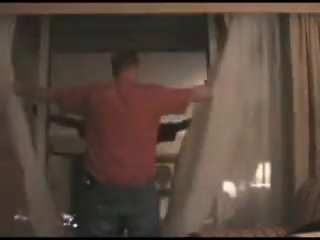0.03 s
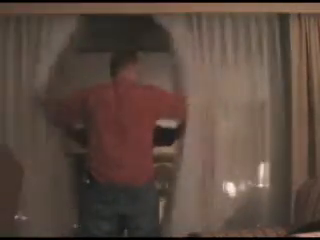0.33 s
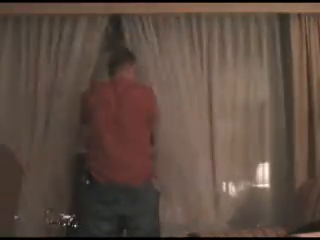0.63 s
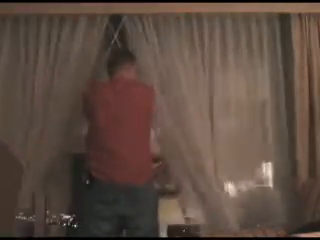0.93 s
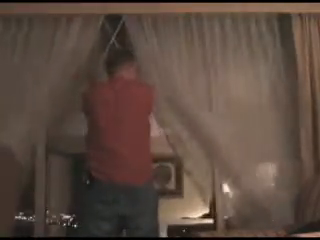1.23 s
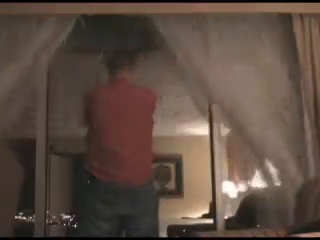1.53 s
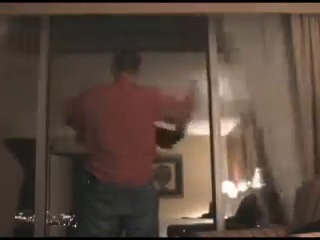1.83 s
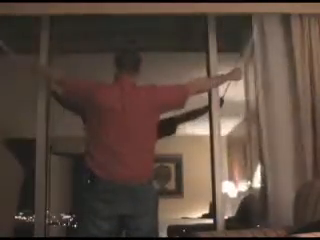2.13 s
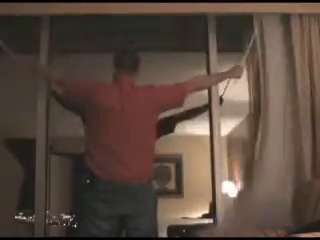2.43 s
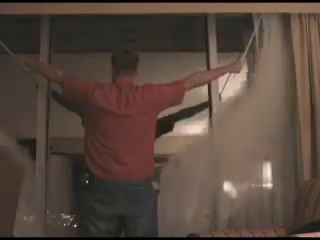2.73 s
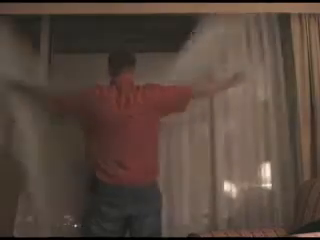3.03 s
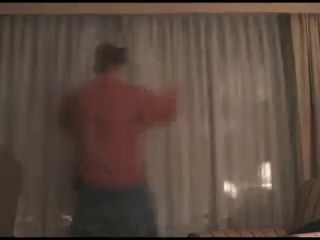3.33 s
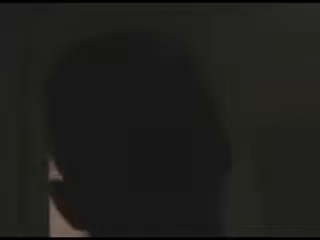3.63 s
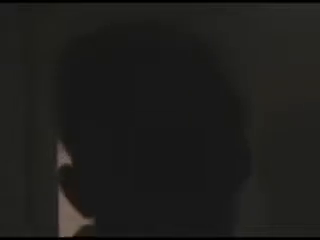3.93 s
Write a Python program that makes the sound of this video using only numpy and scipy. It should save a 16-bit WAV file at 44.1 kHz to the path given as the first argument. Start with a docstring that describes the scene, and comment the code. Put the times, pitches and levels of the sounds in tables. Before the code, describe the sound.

In a furnished room, curtains are tugged back and forth five times without a pause, their gliders swishing and clicking along a ringing rail. The sliding cuts off and a quiet room hum with a thin whine remains.

```python
"""Curtains on a ceiling track.

Five pulls, shut and open, in a furnished room. Plastic gliders chatter in the rail and make it ring,
then clack together as they bunch up; the track jolts with dull thuds.
At the end the sliding breaks off and a low room hum with a thin whine remains."""
import sys
import numpy as np
from scipy import signal
from scipy.fft import rfft, irfft, next_fast_len
from scipy.io import wavfile
from scipy.ndimage import map_coordinates

SR = 44100
rng = np.random.default_rng(int(sys.argv[2]) if len(sys.argv) > 2 else 0)


def file_out(sig):
    """Save sig as 16-bit WAV at sys.argv[1]."""
    # one column per channel
    cols = np.atleast_2d(sig).T
    # limit, then scale
    lim = np.clip(cols, -1, 1)
    pcm = np.round(lim * 32767).astype(np.int16)
    wavfile.write(sys.argv[1], SR, pcm)


N = 176400
IMPACT_ATTACK_S, IMPACT_T60_S = 0.0014, 0.14

# track body spectrum (frequency [Hz], density [dB])
BODY_SPECTRUM = [(90, -36), (170, -9.5), (290, -8.5), (460, -10.5), (540, -2), (720, -2.5), (900, -5),
                 (1250, 0), (1600, 0), (2000, -4), (3500, -48)]
# glider fizz spectrum (frequency [Hz], density [dB])
FIZZ_SPECTRUM = [(2500, -26), (4500, -1), (5500, -2.5), (6600, 0.5), (8500, -2.5), (10300, -3), (11500, -7),
                 (12600, -17), (13500, -36)]


def sliding():
    """Gliders drag along the rail: faster is louder, and the rail's resonances swell and fade."""
    # per pull: envelope points (time [s], level [dB])
    pulls = [
        [(0.0, -40.5), (0.06, -28), (0.17, -18), (0.378, -18), (0.39, -22), (0.5, -19.5), (.6, -29),
         (0.7, -34.5), (0.76, -50)],
        [(0.76, -49), (0.796, -24), (0.942, -18.5), (1.342, -17), (1.364, -19.5), (1.416, -19), (1.444, -23),
         (1.58, -31.5)],
        [(1.58, -32.5), (1.674, -22.5), (1.81, -18.5), (1.952, -18), (2.138, -24.5), (2.184, -28), (2.196, -25),
         (2.3, -41.5)],
        [(2.3, -37), (2.316, -39.5), (2.36, -28), (2.6, -19.5), (2.786, -15.5), (2.912, -19), (3.106, -34.5),
         (3.14, -45)],
        [(3.14, -40.5), (3.25, -23.5), (3.366, -17), (3.556, -16.5), (3.58, -19.5), (3.6, -15), (3.684, -26.5),
         (3.69, -34)],
    ]
    # per pull: (body [dB], fizz [dB], rail pitch [Hz], rail width [Hz], scrape pitch [ratio], body rise [s])
    colours = [(-7.5, -8.5, 3380, 980, 1, .02), (-6.5, -7.5, 3255, 170, 0.99, 0.088),
               (-7, -9.5, 3220, 380, 1.03, .01), (-6, -8.5, 3275, 140, 1.005, 0.017),
               (-5.5, -9, 3410, 230, 0.99, 0.016)]
    # per pull: rail resonance swell (peak time [s], spread [s], gain [dB])
    rail_swells = [(.32, 0.41, -1), (.98, 0.091, 0.5), (1.85, 0.14, -3), (2.51, 0.083, 1),
                   (3.53, 0.032, -1)]
    # per pull: swell of the rail's hollow (peak time [s], spread [s], gain [dB])
    hollow_swells = [(.22, 0.097, -6), (.9, 0.41, -10.5), (1.7, 0.13, -7.5), (2.5, 0.25, -11),
                     (3.28, 0.051, -8.5)]
    # scrape spectrum (frequency [Hz], density [dB])
    scrape_spectrum = [(700, -40.5), (1500, -18), (1850, -12.5), (2200, -5.5), (2900, -1.5), (3500, -2.5),
                       (4000, -7), (4600, -11.5), (5500, -18.5), (9000, -64)]
    # narrow track modes (frequency [Hz], width [Hz], gain [dB])
    track_modes = [(558, 50, -3.5), (692, 73, -2.5), (2164, 32, 7.5), (5060, 32, -16)]
    hollow_hz, hollow_width_hz = 1126, 156
    taps_db, tinkle_db, modes_db = -18.5, -15, -14
    body_db_per_db, fizz_db_per_db = 1.12, 1.03
    body_db_per_s = -10  # as the gliders gather
    modes = lambda hz: sum(amp(db) * resonance(centre, width)(hz) for centre, width, db in track_modes)
    jerks_db = 0.52 * wobble(45)
    out = np.zeros((2, N))
    for pull, colour, rail_swell, hollow_swell in zip(pulls, colours, rail_swells, hollow_swells):
        body_db, fizz_db, rail_hz, rail_width_hz, pitch_ratio, rise_s = colour
        times_s, levels_db = np.transpose(pull)
        span = slice(int(times_s[0] * SR), int(times_s[-1] * SR))
        t = clock()[span]
        speed_db = np.interp(t, times_s, levels_db) - levels_db.max() + jerks_db[span]
        trend_db = body_db_per_s * (t - t.mean())
        taps = glider_taps(len(t)) * amp(speed_db + taps_db)
        scrape = friction(lambda hz: shape(scrape_spectrum)(hz / pitch_ratio), speed_db)
        tinkles = tinkle(len(t)) * amp(speed_db + tinkle_db)
        body = friction(shape(BODY_SPECTRUM), body_db_per_db * speed_db + body_db + trend_db)
        body *= np.clip((t - times_s[0]) / rise_s, 0, 1) ** 2
        fizz = friction(shape(FIZZ_SPECTRUM), fizz_db_per_db * speed_db + fizz_db)
        rail = friction(resonance(rail_hz, rail_width_hz, order=2), speed_db + swell_db(t, *rail_swell))
        hollow = friction(resonance(hollow_hz, hollow_width_hz, order=2),
                          speed_db + swell_db(t, *hollow_swell))
        track = friction(modes, speed_db + modes_db)
        layers = taps + scrape + tinkles + body + fizz + rail + hollow + track
        out[:, span] += amp(levels_db.max()) * layers
    return out


def friction(response, level_db):
    """Dense slips and rubbing, filtered by a response, following a level curve."""
    size = len(level_db)
    slips = chatter(next_fast_len(size), rate_per_s=2600, spread_db=5, life_s=0.00027, smooth=1)
    return stereo(slips, response)[:, :size] * amp(level_db)


def chatter(size, rate_per_s, spread_db, life_s, smooth):
    """Tiny slips of random size, each a short burst, over a share of smooth rubbing."""
    onsets = rng.random(size) < rate_per_s / SR
    energy = onsets * amp(spread_db * np.clip(rng.standard_normal(size), -2, 2)) ** 2
    power = signal.lfilter([1], [1, -np.exp(-1 / (life_s * SR))], energy)
    return rng.standard_normal((2, size)) * np.sqrt(power / (power.mean() + 1e-12) + smooth)


def glider_taps(size):
    """Single gliders tick along the way."""
    taps = chatter(next_fast_len(size), rate_per_s=48, spread_db=0.5, life_s=0.0075, smooth=0)
    return stereo(taps, shape(FIZZ_SPECTRUM))[:, :size]


def tinkle(size, rate_per_s=40, low_hz=4300, high_hz=10500, attack_s=0.0004, t60_s=0.07):
    """Loose gliders tap one another; each tap rings at three pitches of its own."""
    t = np.arange(SR // 10) / SR
    envelope = (1 - np.exp(-t / attack_s)) * amp(-60 * t / t60_s)
    out = np.zeros((2, size + len(t)))
    for place, *pitches in rng.random((int(rate_per_s * size / SR), 4)):
        hz = low_hz * (high_hz / low_hz) ** np.array(pitches)
        phase_rad = rng.normal(0, 0.83, (2, len(hz), 1))
        ring = np.sin(2 * np.pi * hz[:, None] * t + phase_rad).sum(axis=1)
        out[:, int(place * size):][:, :len(t)] += ring * envelope
    return unit(out[:, :size])


def clacks(crack_db=-3.5, crack_t60_s=0.043):
    """A glider runs into its neighbours: a crack, then a dying rattle of bright ticks and rail knocks."""
    # collisions (time [s], level [dB], knock gain [dB])
    collisions = [(.423, -24, 2), (.462, -21.5, 5.5), (0.494, -23.5, -2), (.571, -33, 11), (0.618, -33, 4),
                  (.788, -49, -8), (1.032, -23.5, 4), (1.11, -25, 11), (1.322, -19.5, 1), (1.375, -20, -4),
                  (1.405, -21.5, 4), (1.811, -17.5, 0.5), (1.924, -20.5, 1.5), (1.971, -16, -13),
                  (2.014, -19, -0.5), (2.067, -22, 2), (2.19, -23.5, 2), (2.814, -21.5, 0),
                  (2.876, -17.5, 0), (2.901, -20, -7), (3.483, -17, -2), (3.55, -17, -16),
                  (3.594, -22.5, -2)]
    # rail knock spectrum (frequency [Hz], density [dB])
    knock_spectrum = [(200, -27), (550, -17), (1200, -5.5), (1800, -4), (2800, 7.5), (3500, 3.5),
                      (5000, -12.5), (9000, -33)]
    t = np.arange(SR // 5) / SR
    decay = amp(-60 * t / IMPACT_T60_S) + amp(crack_db - 60 * t / crack_t60_s)
    envelope = (1 - np.exp(-t / IMPACT_ATTACK_S)) * decay
    out = np.zeros((2, N + SR))
    for start_s, db, knock_db in collisions:
        ticks = chatter(len(t), rate_per_s=3000, spread_db=2, life_s=0.0005, smooth=0.5)
        bright = stereo(ticks, shape(FIZZ_SPECTRUM))
        knocks = amp(knock_db) * stereo(ticks, shape(knock_spectrum))
        out[:, round(start_s * SR):][:, :len(t)] += amp(db) * envelope * (bright + knocks)
    return out[:, :N]


def thuds():
    """The whole track jolts, dull and short."""
    # jolts (time [s], level [dB])
    jolts = [(0.465, -22.5), (.573, -36), (1.323, -32), (2.07, -20.5), (3.596, -20)]
    t = clock()
    envelope = sum((t > s) * amp(db - 60 * abs(t - s) / IMPACT_T60_S) for s, db in jolts)
    return stereo(rng.standard_normal((2, N)), shape(BODY_SPECTRUM)) * envelope


def pings():
    """The rail rings briefly as the second pull jerks the curtains from rest."""
    # rail rings (time [s], frequency [Hz], level [dB], T60 [s])
    rings = [(.787, 1149, -30, .2), (.787, 2520, -19.5, .17), (.836, 2690, -15.5, 0.16)]
    out = np.zeros(N)
    for start_s, hz, db, t60_s in rings:
        age_s = np.maximum(clock() - start_s, 0)
        envelope = (1 - np.exp(-age_s / IMPACT_ATTACK_S)) * amp(db - 60 * age_s / t60_s)
        out += envelope * np.sin(2 * np.pi * hz * age_s + 0.5 * wobble(220))
    return out


def room(x, t60_s=0.2, wet_db=-10.5, gap_s=0.004):
    """Adds the short, soft reverberation of a furnished room."""
    t = np.arange(SR // 2) / SR
    tail = stereo(rng.standard_normal((2, len(t))), np.ones_like) * amp(-60 * t / t60_s) * (t > gap_s)
    return x + amp(wet_db) * signal.fftconvolve(x, tail / np.linalg.norm(tail[0]), axes=1)[:, :N]


def room_tone(air_db=-40):
    """Air and low tones while the curtains move."""
    # air spectrum (frequency [Hz], density [dB])
    air_spectrum = [(25, -32), (50, -2.5), (85, -4.5), (165, -3), (220, -7), (500, -12), (2000, -20.5),
                    (10000, -32.5), (15000, -48)]
    # low tones (frequency [Hz], level [dB])
    lines = [(84, -56.5), (122, -55.5), (166, -50)]
    return amp(air_db) * air(air_spectrum) + tones(lines)


def hum(air_db=-37, rustle_s=3.96, rustle_width_s=0.019, rustle_db=-47.5):
    """Low tones and a thin whine over still air, with one faint rustle."""
    # still air spectrum (frequency [Hz], density [dB])
    air_spectrum = [(25, -43), (49, -17), (75, -7), (95, -24), (167, -3.5), (237, -21.5), (286, -19.5),
                    (373, -25.5), (3730, -44.5), (5010, -36), (5420, -43.5), (15000, -52.5)]
    # hum and whine (frequency [Hz], level [dB])
    lines = [(64.6, -51), (143, -60), (162, -42), (186, -56), (4953, -60), (8188, -68), (11600, -69)]
    envelope = np.exp(-0.5 * ((clock() - rustle_s) / rustle_width_s) ** 2)
    rustle = amp(rustle_db) * envelope * air(FIZZ_SPECTRUM)
    return tones(lines) + amp(air_db) * air(air_spectrum) + rustle


def tones(lines):
    """Slightly wavering steady tones."""
    return sum(amp(db) * np.sqrt(2) * np.sin(2 * np.pi * hz * clock() + 0.5 * wobble(12))
               for hz, db in lines)


def air(spectrum):
    """Steady diffuse noise, rms 1."""
    # stereo image of the air (frequency [Hz], left-right correlation [-1..1])
    correlation = [(60, -0.72), (100, -0.55), (150, 0.27), (1400, 0.58), (3100, 0.73), (7000, 0.5)]
    return stereo(rng.standard_normal((2, N)), shape(spectrum), correlation)


def stereo(pair, response, correlation=None):
    """Two independent drives filtered and mixed as mid and side, rms 1."""
    # stereo image of the curtains (frequency [Hz], left-right correlation [-1..1])
    curtain_correlation = [(60, -0.21), (150, 0.52), (350, 0.86), (1400, 1), (2800, 0.95), (5500, 0.78),
                           (9000, 0.85), (13000, 0.0039)]
    hz = np.fft.rfftfreq(pair.shape[1], 1 / SR)
    angle = np.arccos(log_interp(correlation or curtain_correlation, hz)) / 2
    mid, side = irfft(rfft(pair) * response(hz) * [np.cos(angle), np.sin(angle)], pair.shape[1])
    return unit(np.array([mid + side, mid - side]))


def resonance(centre_hz, width_hz, order=1):
    """Response of a damped mode, cascaded order times."""
    return lambda hz: (1j * hz * width_hz / (centre_hz ** 2 - hz ** 2 + 1j * hz * width_hz)) ** order


def swell_db(t, peak_s, spread_s, peak_db):
    """One peak with gentle flanks."""
    return peak_db - 10 * np.log10(1 + ((t - peak_s) / spread_s) ** 2)


def shape(points):
    """Response through (Hz, dB) points."""
    return lambda hz: amp(log_interp(points, hz))


def log_interp(points, hz):
    """(Hz, value) points interpolated on a log axis."""
    knots_hz, values = np.transpose(points)
    return np.interp(np.log(hz + 1), np.log(knots_hz + 1), values)


def wobble(knots_per_s):
    """Smooth random curve."""
    knots = rng.standard_normal(int(N * knots_per_s / SR) + 4)
    return map_coordinates(knots, [clock() * knots_per_s])


def amp(db):
    """Decibels to gain."""
    return 10 ** (np.asarray(db) / 20)


def unit(x):
    """Scaled to rms 1."""
    return x / np.sqrt(np.mean(x ** 2) + 1e-20)


def clock():
    """Sample times [s]."""
    return np.arange(N) / SR


def scene(stop_s=3.686, fade_s=0.011):
    """Curtains in their room, giving way abruptly to the hum."""
    moving = np.clip((stop_s - clock()) / fade_s + 0.5, 0, 1)
    curtains = amp(-1.5) * room(sliding() + clacks() + thuds() + pings())
    return moving * (curtains + room_tone()) + (1 - moving) * hum()


def record(dry, left_lead_s=17e-6, left_db=-0.4, top_hz=15800):
    """Sound reaches the left microphone port slightly earlier and softer; the top band is cut."""
    size = next_fast_len(N + SR // 2)
    hz = np.fft.rfftfreq(size, 1 / SR)
    halves = np.array([[0.5], [-0.5]])
    ports = amp(left_db * halves) * np.exp(2j * np.pi * hz * left_lead_s * halves)
    return irfft(rfft(dry, size) * ports * (hz < top_hz), size)[:, :N]


dry = scene()
out = record(dry)
file_out(out)
```